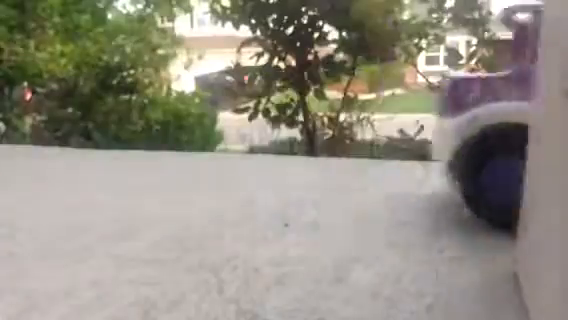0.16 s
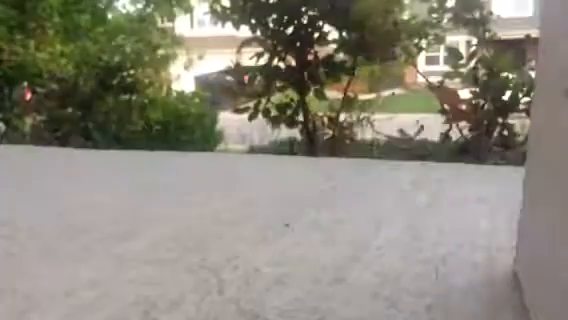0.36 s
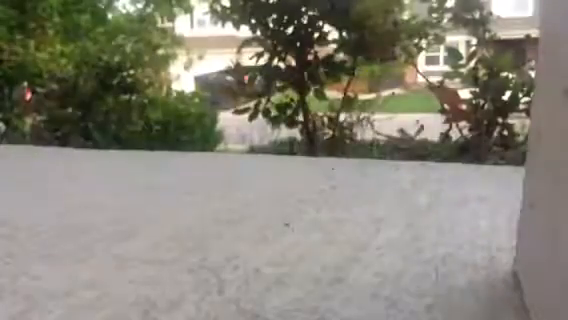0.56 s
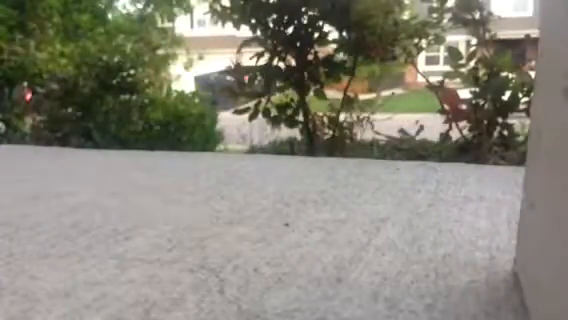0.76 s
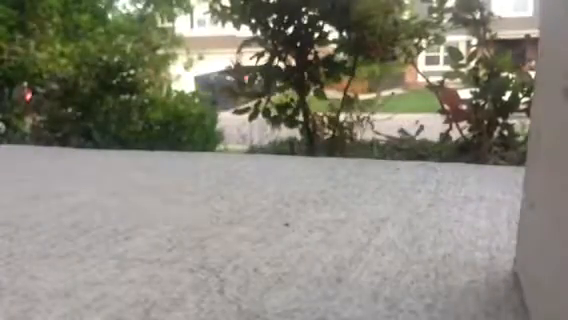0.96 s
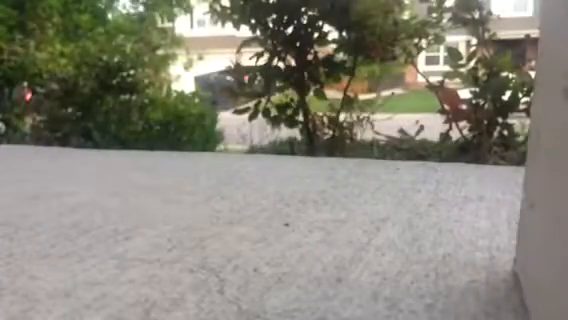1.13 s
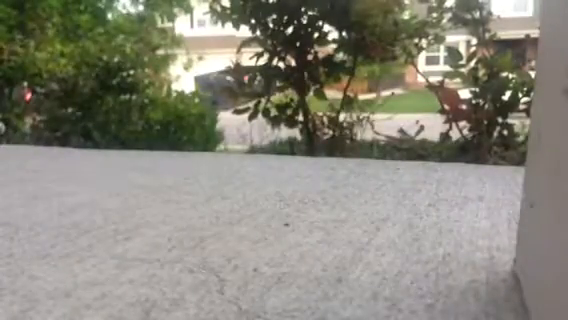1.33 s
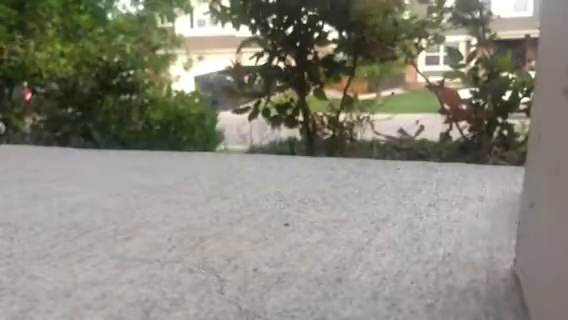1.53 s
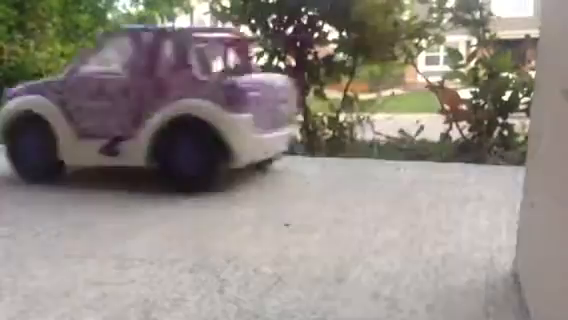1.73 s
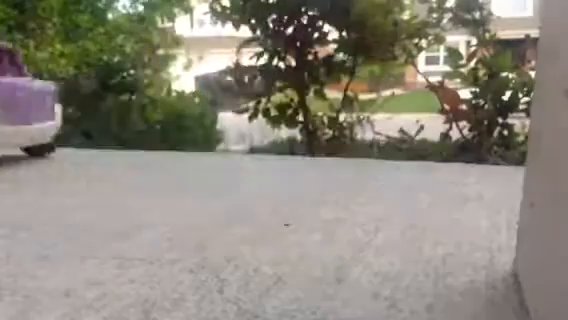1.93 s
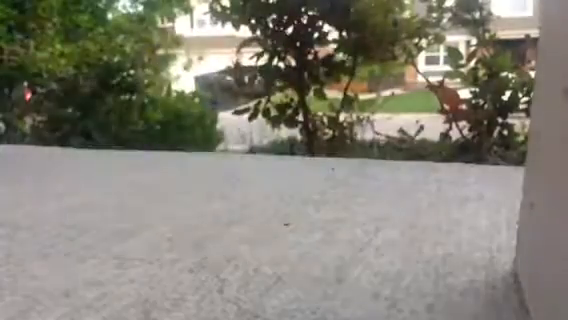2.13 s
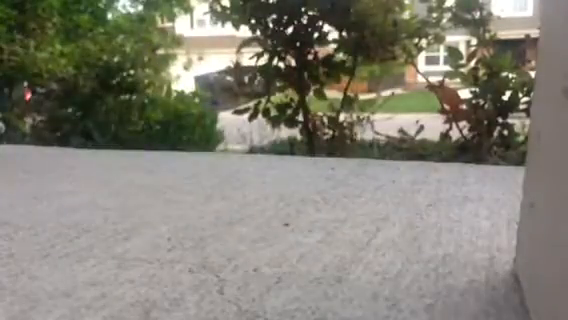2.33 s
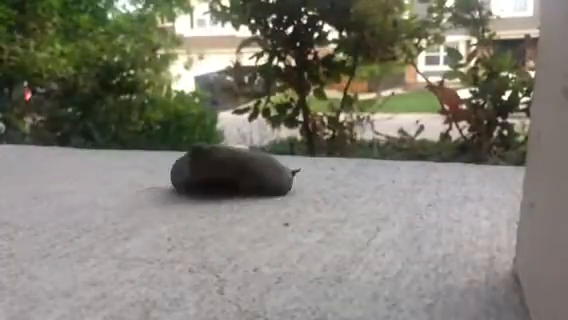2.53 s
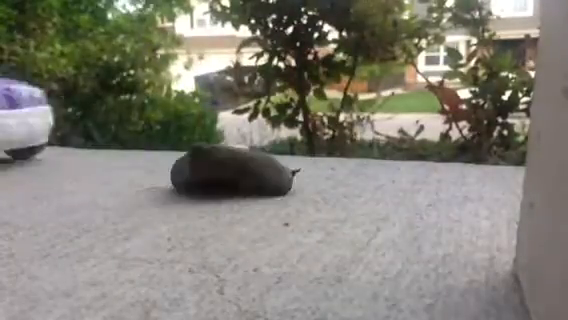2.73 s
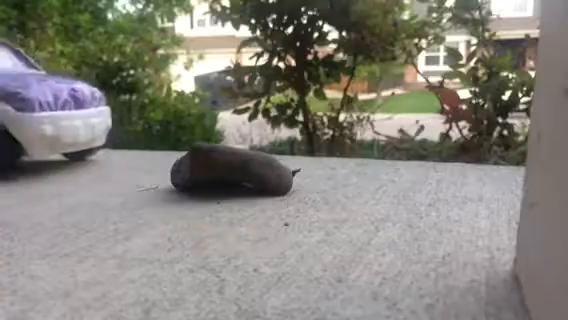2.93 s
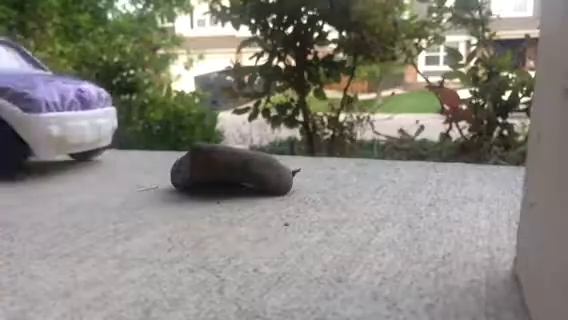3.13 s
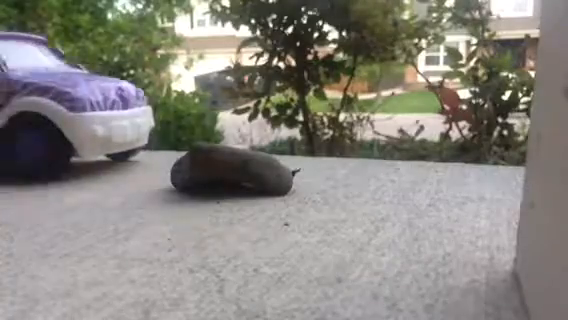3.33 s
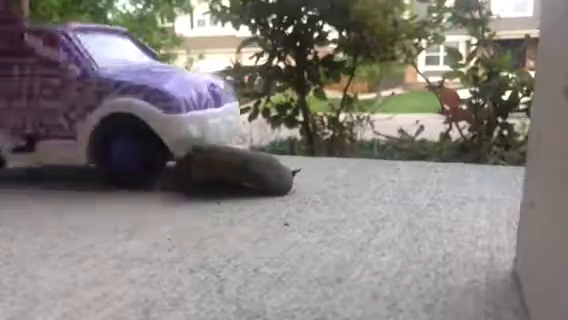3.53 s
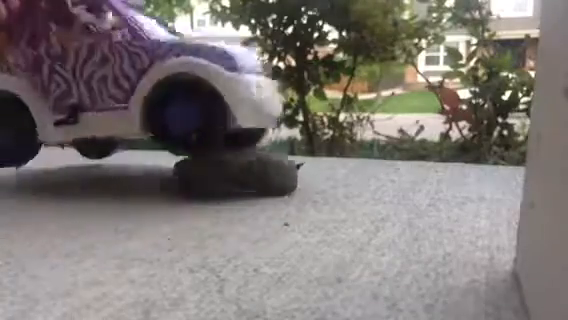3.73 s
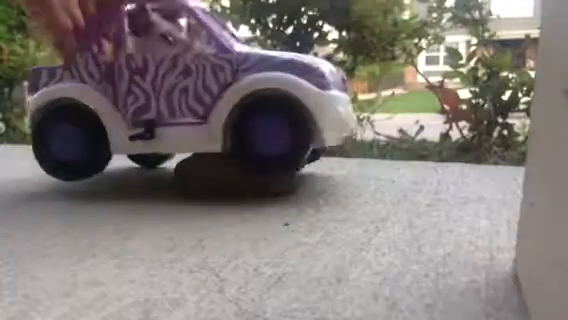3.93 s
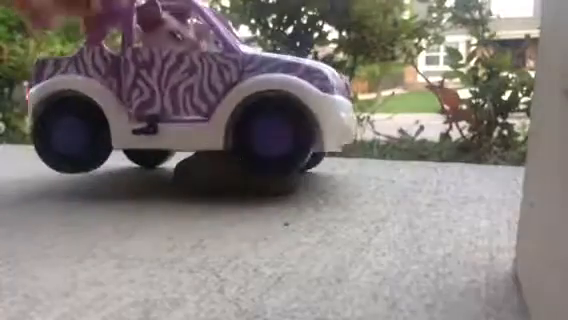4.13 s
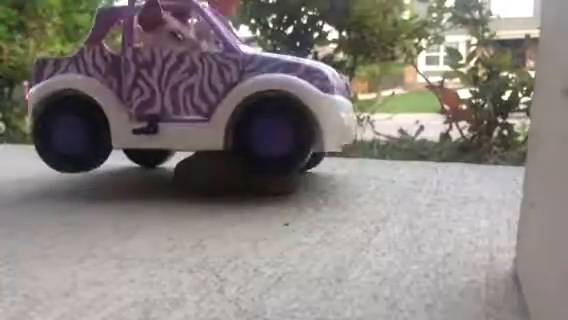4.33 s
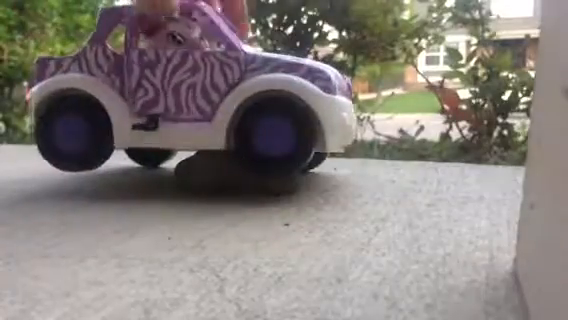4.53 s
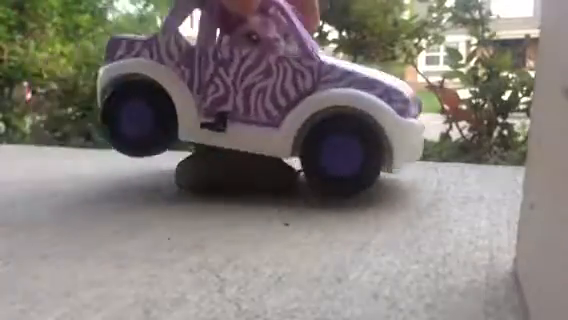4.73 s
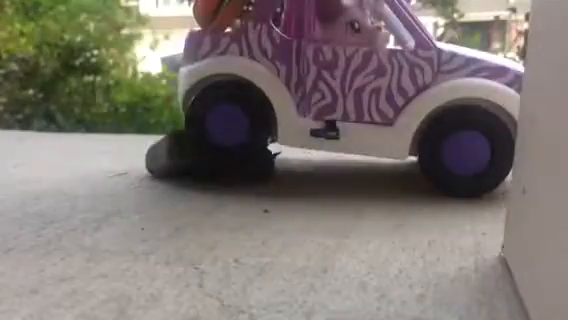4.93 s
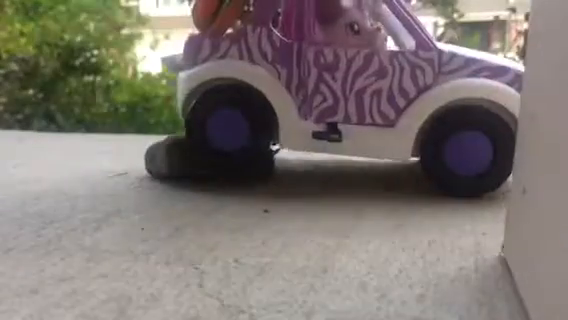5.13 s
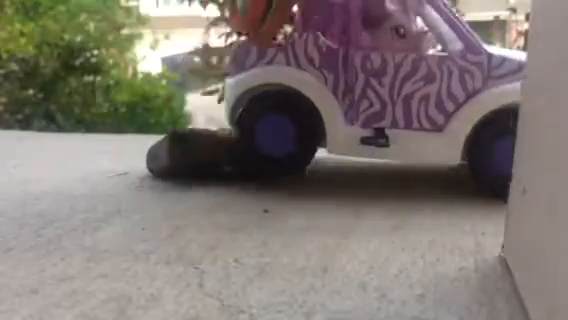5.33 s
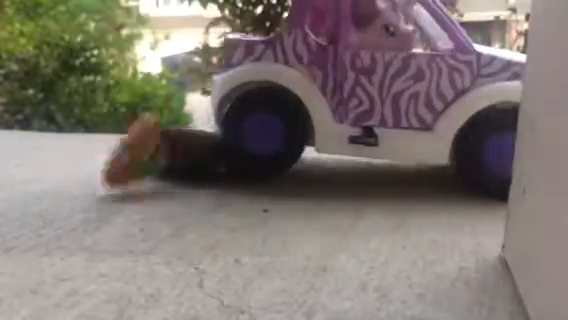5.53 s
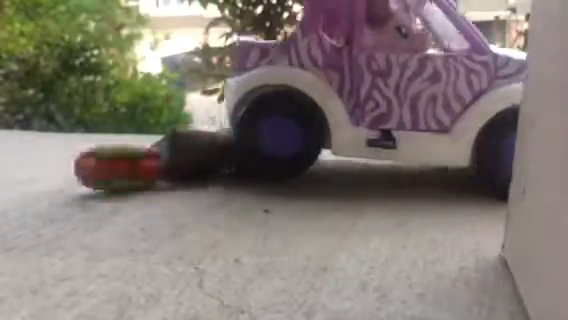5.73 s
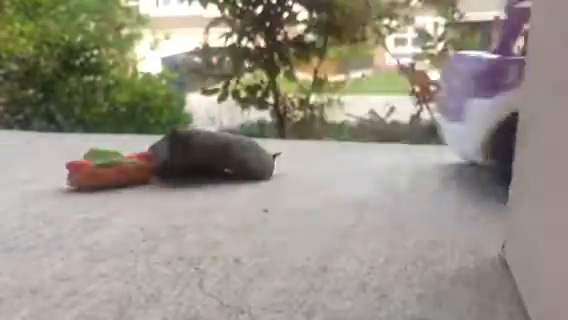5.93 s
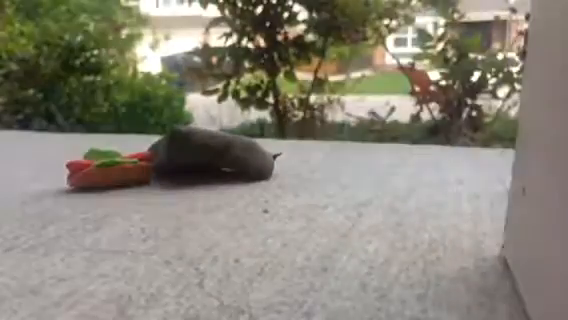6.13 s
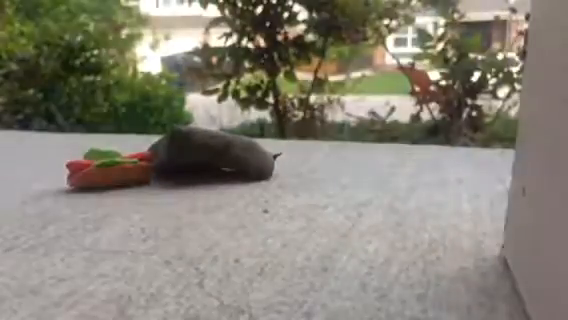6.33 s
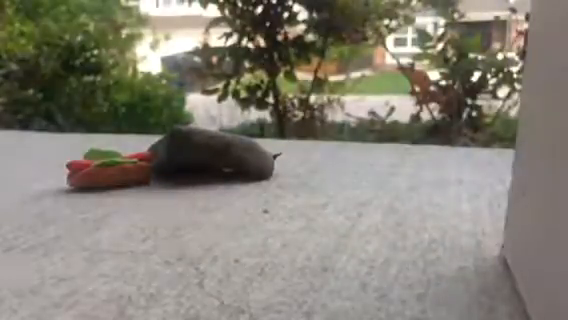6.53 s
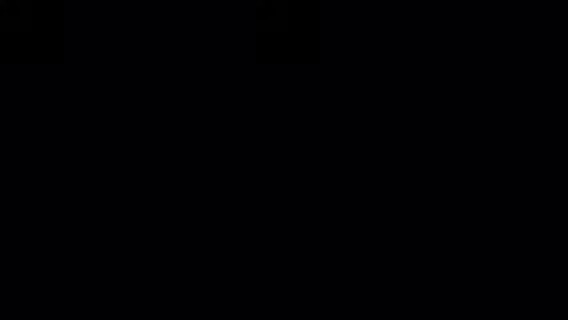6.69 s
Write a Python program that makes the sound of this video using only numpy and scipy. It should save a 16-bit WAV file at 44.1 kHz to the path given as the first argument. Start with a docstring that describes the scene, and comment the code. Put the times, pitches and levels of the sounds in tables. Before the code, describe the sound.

A hollow plastic toy car rattles over rough concrete in bursts, then knocks and scrapes over a stone, with faint traffic and birds behind.

```python
"""Outdoors on rough concrete: close to the microphone a hollow plastic toy car is pushed along and over a stone.
Grit under the wheels and single knocks drive the resonances of its shell; a duller scuff is just out of sight.
Far behind are traffic (coloured noise), a wavering hum (noise in narrow resonances) and small birds (gliding sines).
In four stretches the background takes new levels; the whole level dips briefly between them."""
import sys
import numpy as np
from scipy import signal
from scipy.io import wavfile

SR = 44100
rng = np.random.default_rng(int(sys.argv[2]) if len(sys.argv) > 2 else 0)


def unload_audio(sound):
    """Save the sound as a 16-bit wav file, at the path given as the first command line argument."""
    columns = np.transpose(np.atleast_2d(sound))
    # keep every value between -1 and 1, then stretch to whole-number steps
    steps = np.round(np.clip(columns, -1, 1) * 32767)
    wavfile.write(sys.argv[1], SR, steps.astype(np.int16))


N = 298116


def amp(db):
    """Convert dB to gain."""
    return 10 ** (np.asarray(db) / 20)


def rms_one(x):
    """Scale to rms 1."""
    return x / np.sqrt(np.mean(x ** 2) + 1e-20)


def in_time(rows):
    """Interpolate the columns of a curve table at every sample."""
    s, *columns = np.transpose(rows)
    return [np.interp(np.arange(N) / SR, s, column) for column in columns]


def drift(rate_hz):
    """Random wander of rms 1: white noise through a two-pole lowpass."""
    r = np.exp(-2 * np.pi * rate_hz / SR)
    wander = signal.lfilter([1], [1, -2 * r, r * r], rng.standard_normal(N + SR))
    return rms_one(wander[SR:])   # skip the filter's first second


def resonate(x, hz, width_hz):
    """Two-pole resonance with a peak gain of about 1."""
    r = np.exp(-np.pi * width_hz / SR)
    zeros = np.array([1, 0, -1]) * (1 - r * r) / 2
    return signal.lfilter(zeros, [1, -2 * r * np.cos(2 * np.pi * hz / SR), r * r], x)


def ring(force, modes):
    """One force per mode into parallel resonances of alternating sign; a shared white force of rms 1 gives rms 1."""
    def add_modes(forces):
        return sum((-1) ** k * amp(db) * resonate(forces[k], hz, width_hz)
                   for k, (hz, width_hz, db) in enumerate(modes))
    click = signal.unit_impulse(SR // 10)
    return add_modes(force) / np.linalg.norm(add_modes([click] * len(modes)))


def scatter(x, t60_s, wet_db):
    """Walls, slab and leaves around the spot scatter a short, dull tail."""
    span = np.arange(SR // 3) / SR
    tail = rng.standard_normal(len(span)) * amp(-60 * span / t60_s) * (span > .003)
    tail = signal.lfilter([1], [1, -.4], tail)
    return x + amp(wet_db) * signal.fftconvolve(x, tail / np.linalg.norm(tail))[:N]


# The four stretches and how loud the distance is in each.
# Each row: start in seconds, traffic rumble in dB before its swell, tyre hiss in dB, hum in dB.
STRETCHES = [(0, -51, -58.5, -68.5), (1.231, -53, -59.5, -64), (2.561, -49.5, -54, -54.5),
             (4.929, -51, -57, -57)]


def background(column):
    """Level in dB of one background column, steady within each stretch."""
    table = np.array(STRETCHES)
    stretch = np.searchsorted(table[:, 0], np.arange(N) / SR, "right") - 1
    return table[stretch, column]


def coloured(spectrum, patchy_db):
    """Noise in half-octave bands, each flickering on its own; rms 1."""
    hz, level_db = np.transpose(spectrum)
    edges_hz = 22 * 2 ** np.arange(0, 9.8, .5)
    white = rng.standard_normal((2, N))   # neighbouring bands take different noise
    out = 0
    for k, (low, high) in enumerate(zip(edges_hz, edges_hz[1:])):
        band_db = np.interp(np.log(low * high) / 2, np.log(hz), level_db)
        band_pass = signal.butter(2, [low, high], "band", fs=SR, output="sos")
        band = signal.sosfilt(band_pass, white[k % 2])
        out = out + amp(band_db + patchy_db * drift(4.6)) * band
    return rms_one(out)


# Spectrum of the far rumble. Each row: frequency in Hz, relative density in dB per Hz.
RUMBLE = [(15, -59), (25, -28.5), (76, -19.5), (112, -3.5), (160, -15.5), (198, -1.5), (340, -2.5),
          (377, -17), (458, -3), (494, -32), (900, -24), (1170, -52.5), (1980, -120)]
# Spectrum of the far tyre hiss. Each row: frequency in Hz, relative density in dB per Hz.
HISS = [(290, -30), (500, -1), (670, -6), (799, -7.5), (980, -3), (1520, -4), (1890, -4), (3450, -20.5),
        (14500, -33), (15800, -34), (16500, -51)]
# Passing traffic swells the rumble. Each row: time in seconds, change in dB.
RUMBLE_SWELL = [(0, 3), (.7, -2), (.95, -3.5), (1.2, 0.5), (4.9, -0.5), (5.05, -1.5), (6.2, 1), (6.76, -5)]


def traffic():
    """Far road as two coloured noises: a low rumble that swells and a tyre hiss."""
    rumble_db = background(column=1) + in_time(RUMBLE_SWELL)[0]
    rumble = amp(rumble_db) * coloured(RUMBLE, patchy_db=2.5)
    hiss = amp(background(column=2)) * coloured(HISS, patchy_db=2.0)
    return rumble + hiss


# The hum in the distance. Each row: frequency in Hz, width of each of two resonances in Hz, relative level in dB.
HUM = [(122.5, 23, -5), (202.15, 5.3, -0.5), (227.8, 6.1, -6), (442.4, 2.9, -9)]


def hum():
    """Noise through pairs of narrow resonances, so that each tone wavers."""
    tones = 0
    for hz, width_hz, db in HUM:
        narrow = resonate(rng.standard_normal(N), hz, width_hz)
        tones = tones + amp(db) * rms_one(resonate(narrow, hz, width_hz))
    return amp(background(column=3)) * tones


# Chirps of far birds, gliding down.
# Each row: start in seconds, length in seconds, start pitch in Hz, end pitch in Hz, level in dB before flicker.
CHIRPS = [(.65, 0.032, 4050, 4000, -68.5), (.79, 0.039, 6300, 6200, -71.5),
          (1.329, 0.06, 8600, 7800, -63.5), (1.358, 0.029, 7900, 5600, -61),
          (2.235, 0.098, 8200, 7300, -71), (2.92, 0.018, 8600, 6160, -59), (2.977, 0.03, 8800, 5000, -67),
          (3.017, .025, 7500, 6260, -65), (3.05, 0.03, 9600, 5300, -62), (3.13, .07, 7360, 4730, -72.5),
          (3.222, 0.035, 5100, 4960, -65), (3.304, 0.026, 5480, 4980, -76),
          (4.243, 0.15, 4980, 4820, -64.5), (6.296, .041, 7200, 5020, -65.5), (6.4, 0.032, 7270, 6520, -69)]
# Buzzy notes of far birds.
# Each row: start in seconds, length in seconds, middle pitch in Hz, level in dB before flicker.
BUZZES = [(1.252, 0.051, 7120, -58), (1.42, .02, 6860, -60), (3.422, 0.086, 7430, -68),
          (5.17, .037, 6950, -59)]
WARBLE_DEPTH_HZ, WARBLE_PER_S = 560, 110


def birds():
    """Near sines of flickering level: chirps glide down, a little faster towards the end; buzzes warble."""
    out = np.zeros(N)
    notes = [(*row, 0) for row in CHIRPS]
    notes += [(s, length, hz, hz, db, WARBLE_DEPTH_HZ) for s, length, hz, db in BUZZES]
    for s, length, start_hz, end_hz, level_db, warble_hz in notes:
        u = np.linspace(0, 1, round(length * SR))   # progress through the note
        glide_hz = end_hz + (start_hz - end_hz) * (1 - u) ** 0.81
        pitch_hz = glide_hz + warble_hz * np.sin(2 * np.pi * WARBLE_PER_S * u * length)
        swell = np.abs(np.sin(np.pi * u)) ** 0.5
        at = round(s * SR)
        out[at:at + len(u)] += amp(level_db) * swell * np.sin(2 * np.pi * np.cumsum(pitch_hz) / SR)
    return out * amp(2.9 * drift(150))


def grit(bumps_per_s, spread_db, bump_t60_s, lumpy_db):
    """Force of rubbing on grit: uneven pebbles each give a short swell of rattle, over finer grain; rms 1."""
    pebble_db = spread_db * np.minimum(rng.exponential(1, N), 3)
    pebbles = amp(pebble_db) * (rng.random(N) < bumps_per_s / SR)
    r = amp(-60 / (bump_t60_s * SR))
    rattle = rms_one(signal.lfilter([1], [1, -2 * r, r * r], pebbles))   # climbs the pebble, then drops off
    grain = 1.4 * amp(lumpy_db * drift(68))
    return rms_one((rattle + grain) * rng.standard_normal(N))


# Level of the scuff just out of sight. Each row: time in seconds, level in dB.
SCUFF = [(0, -91), (1.02, -76), (1.09, -66), (1.11, -49.5), (1.2, -49.5), (1.23, -56), (1.235, -95)]
# Its dull body. Each row: frequency in Hz, width in Hz, relative level in dB.
SCUFF_BODY = [(1122, 290, 3), (1779, 800, -7.5), (2800, 220, -10), (7500, 5000, -29)]


def scuff():
    """Fine grit drives a body duller than the car."""
    force = amp(in_time(SCUFF)[0]) * grit(bumps_per_s=140.0, spread_db=-1.0, bump_t60_s=0.012, lumpy_db=1.0)
    return ring([force] * len(SCUFF_BODY), SCUFF_BODY)


# The car rolls close by, one curve for each push. Each row of a curve: time in seconds, level in dB.
ROLLS = [
    [(0, -18.5), (.12, -20.5), (.24, -24.5), (.3, -33), (.39, -43), (.41, -51), (.5, -51)],
    [(1.53, -64), (1.58, -25.5), (1.7, -17), (1.82, -18.5), (1.86, -22.5), (2.01, -23.5), (2.03, -36),
     (2.13, -35), (2.15, -53.5), (2.22, -74)],
    [(2.58, -66), (2.63, -38), (2.7, -36), (2.74, -43.5), (2.8, -29), (2.86, -32.5), (2.88, -41),
     (2.9, -32), (2.95, -68)],
    [(3.15, -78), (3.22, -61.5), (3.54, -49), (3.56, -34), (3.62, -32), (3.632, -54), (3.69, -46)],
    [(5.8, -62), (5.82, -33), (5.85, -26), (5.868, -16.5), (5.89, -31), (6.03, -36.5), (6.1, -38.5),
     (6.18, -51), (6.25, -73)],
]
# Each entry: brightness of one push at LOUD_DB, in dB per octave.
ROLL_BRIGHT = [-1, -1, -1, -6, 1]
# Brightness follows roll level: reference in dB, slope in dB per octave per dB, lowest change in dB per octave.
LOUD_DB, DULLING, DULLEST = -20.5, 0.46, -9.5
# Short scrapes of plastic on grit and stone.
# Each row: peak time in seconds, rise in seconds, fall in seconds, peak in dB, brightness in dB per octave.
SCRAPES = [(0.664, 0.086, 0.035, -64, 5.5), (1.39, 0.017, .05, -45.5, -13), (1.42, 0.034, 0.029, -41, -14),
           (2.445, 0.023, 0.085, -69.5, 11), (3.821, 0.007, 0.051, -31.5, -11),
           (3.869, 0.02, 0.059, -28, -8), (3.951, 0.017, 0.0066, -35, -2), (3.993, 0.065, .012, -25.5, -5),
           (4.26, 0.08, 0.67, -58, -21), (4.325, .025, .03, -57, 4), (4.595, 0.21, 0.023, -53.5, -0.5),
           (4.745, 0.066, 0.0074, -36.5, 2.5), (4.77, .012, .07, -49.5, 5), (4.882, 0.085, 0.019, -45, 5),
           (5.1, 0.01, 0.079, -51.5, -4), (5.428, 0.16, 0.031, -38, -0.5), (5.521, .012, 0.24, -46.5, -0.5),
           (5.611, 0.026, 0.018, -32, -6.5)]
SCRAPE_SWELL_DB = 25.5   # a scrape swells and sinks by this much


def rubbing(octaves):
    """Gain on each mode from rolls and scrapes; a roll dulls as it grows fainter."""
    strokes = [(rows, bright, DULLING) for rows, bright in zip(ROLLS, ROLL_BRIGHT)]
    for s, rise, fall, peak_db, bright in SCRAPES:
        faint_db = peak_db - SCRAPE_SWELL_DB
        strokes.append(([(s - rise, faint_db), (s, peak_db), (s + fall, faint_db)], bright, 0))
    power = np.zeros((len(octaves), N))
    for rows, bright, dulling in strokes:
        s, db = np.transpose(rows)
        span = np.arange(max(round(s[0] * SR), 0), round(s[-1] * SR))
        level_db = np.interp(span / SR, s, db)
        tilt_db = bright + np.maximum(dulling * (level_db - LOUD_DB), DULLEST)
        power[:, span] += amp(level_db + np.outer(octaves, tilt_db)) ** 2
    return np.sqrt(power)


# Knocks of wheels, axles and floor pan, close by.
# Each row: time in seconds, strength in dB before reach and chance, brightness in dB per octave.
KNOCKS = [(.0074, -1, 3), (0.0167, -5, 2), (.0274, -2, -2.5), (0.05, -4, 3), (0.0627, -9.5, 4),
          (0.077, -12.5, 4.5), (.0993, -11, 6.5), (0.1315, -12, 5), (0.1503, -6.5, 6.5), (.171, -6, 0),
          (0.2188, -11, 5), (.2295, -9, 3), (.312, -20.5, -2), (0.3443, -17, -9), (0.3723, -24.5, -5),
          (0.4567, -30, -12), (1.2463, -39, -10), (1.294, -28.5, -5), (1.5727, -16, -2), (1.6064, -7.5, -1),
          (1.6623, -5.5, -0.5), (1.6766, -10, 9), (1.6892, -10.5, 4), (1.7114, -7, 0.5), (1.7198, -10, 5.5),
          (1.7476, -8.5, 9), (1.7598, -8, 4), (1.869, -7, -1), (1.9103, -3.5, -4.5), (2.042, -18, -5),
          (2.0626, -14.5, -8), (2.163, -33, -8), (2.592, -31, -17), (2.6302, -13, -7.5),
          (2.6582, -14.5, -11), (2.7078, -19, -8.5), (2.7644, -20, -3), (2.7841, -15, -6),
          (2.807, -28, 3.5), (2.813, -15, -2.5), (2.8226, -8, -5), (2.846, -17, -10), (2.8865, -32, -4),
          (2.8983, -22, -16), (2.9064, -17.5, -2), (2.93, -26, -12), (2.9985, -46, 7), (3.445, -40, 3),
          (3.491, -36, -11), (3.61, -36, 9.5), (3.639, -17.5, -11), (3.6967, -8.5, 1), (3.81, -4, 2),
          (3.8136, -4, -3), (3.8617, -17, -2), (3.953, -9, -5.5), (3.9668, 2, 0), (4.156, -22, 7),
          (4.169, -24.5, -13), (4.4582, -29, 1), (4.4754, -15.5, -2), (4.639, -31.5, -7),
          (4.652, -17.5, 4.5), (4.664, -30, -3), (4.7498, -3.5, 0), (4.8446, -32, 0), (4.8888, 1.5, 3),
          (5.0474, -54, 16), (5.072, -20.5, 0), (5.0835, -19, -6), (5.204, -42, -3), (5.432, -31, -23),
          (5.5009, -19.5, -5), (5.5044, -25, -3), (5.527, -37, 6.5), (5.5626, -34, -15),
          (5.5995, -20, -3.5), (5.6063, -22.5, 2), (5.6405, -36, 1), (5.8544, -12, 11), (5.9026, -14, 2.5),
          (5.93, -26, 8), (5.9363, -27, 7), (5.978, -23, 4), (5.9944, -17, -1), (6.031, -25, -6.5),
          (6.0736, -13, -12)]
# Each entry: how strongly a knock, compared with grit, reaches one mode of the shell, in dB.
KNOCK_REACH_DB = [-7.5, -2, 1.5, 3, 1.5, 0.5, -0.5, 1, 0.5, 1.5, 1, -2, -1.5, -2]
KNOCK_T60_S, KNOCK_ATTACK_S = 0.013, 0.00054   # the T60 holds at 2700 Hz


def add_knocks(force, octaves):
    """Add short noise bursts to the force on each mode, with a strength of its own for each knock and mode."""
    span = np.arange(SR // 12) / SR
    dying_db = -60 * np.outer(0.94 ** octaves, span) / KNOCK_T60_S   # treble dies slightly slower
    attack = (1 - np.exp(-span / KNOCK_ATTACK_S)) ** 2   # the plastic gives, then takes the load
    for s, peak_db, tilt_db in KNOCKS:
        contact = np.tanh(1.9 * rng.standard_normal(len(span))) * attack
        chance_db = rng.normal(0, 2.8, len(octaves))
        strength_db = peak_db + tilt_db * octaves + KNOCK_REACH_DB + chance_db
        at = round(s * SR)
        force[:, at:at + len(span)] += amp(strength_db[:, None] + dying_db) * contact


# The hollow shell, with the microphone's treble peaks.
# Each row: frequency in Hz, width in Hz, relative level in dB.
SHELL = [(706, 170, -21.5), (1210, 180, -19), (1771, 98, -2), (2140, 400, -9.5), (2701, 220, -1),
         (3300, 410, -2.5), (3800, 940, -7), (4860, 485, -6), (5642, 350, -8.5), (6140, 750, -13.5),
         (7330, 1300, -15.5), (8870, 500, -10), (10200, 1800, -24.5), (14700, 690, -24)]


def car():
    """Grit and knocks drive every mode of the hollow shell."""
    # octaves from 2700 Hz: brightness acts on the mid and treble modes
    octaves = np.clip(np.log2(np.array(SHELL)[:, 0] / 2700), -.6, 1.9)
    shifting_db = 1.4 * np.array([drift(49) for mode in SHELL])   # the contact wanders from wheel to wheel
    force = rubbing(octaves) * amp(shifting_db) + 1e-18
    force *= grit(bumps_per_s=280.0, spread_db=3.0, bump_t60_s=0.0033, lumpy_db=0.76)
    add_knocks(force, octaves)
    no_bass = signal.butter(3, 700, "high", fs=SR, output="sos")   # the car is too small for bass
    return signal.sosfilt(no_bass, ring(force, SHELL))


def scene():
    """Traffic, hum and birds far off, scuff and car near; the birds carry a longer, stronger tail."""
    far = traffic() + hum() + scatter(birds(), t60_s=0.28, wet_db=-7.5)
    near = scatter(scuff() + car(), t60_s=0.065, wet_db=-14)
    return (far + near)[None]


FADE_DEPTH_DB, FADE_OUT_S, FADE_IN_S, END_S = 20.5, 0.029, 0.025, 6.708
CUTOFF_HZ = 16700


def fades():
    """The level dips briefly where each new stretch begins and stops at the end."""
    t = np.arange(N) / SR
    dips_db = sum(np.interp(t - s, [-FADE_OUT_S, 0, FADE_IN_S], [0, -FADE_DEPTH_DB, 0])
                  for s, *levels in STRETCHES[1:])
    return amp(dips_db) * np.interp(t - END_S, [-.004, .004], [1, 0])


def record(dry):
    """Round the highest peaks, apply the fades and cut the top treble."""
    rounded = dry / (1 + (dry / .9) ** 4) ** .25
    top_cut = signal.cheby2(14, 80, CUTOFF_HZ, fs=SR, output="sos")
    return signal.sosfilt(top_cut, rounded * fades())


dry = scene()
out = record(dry)
unload_audio(out)
```